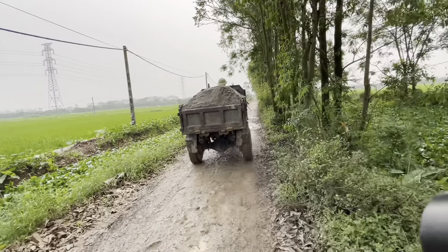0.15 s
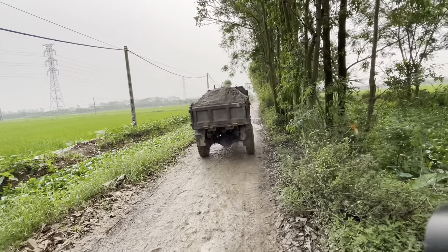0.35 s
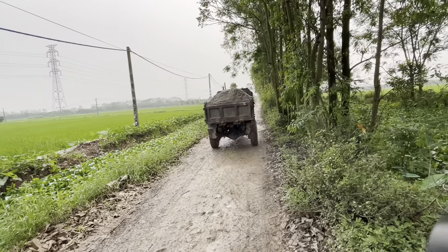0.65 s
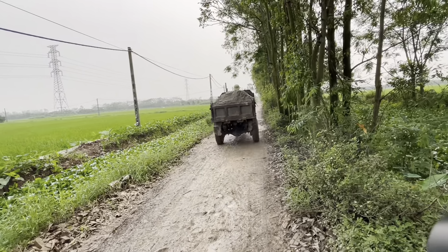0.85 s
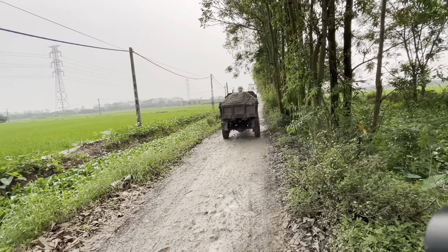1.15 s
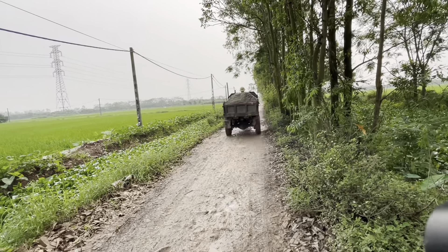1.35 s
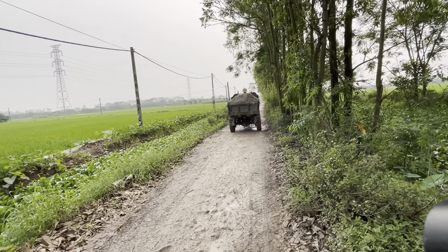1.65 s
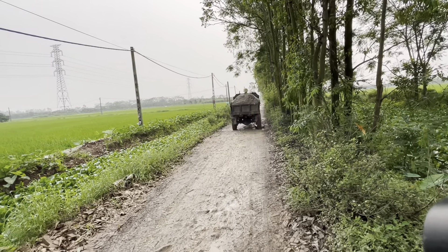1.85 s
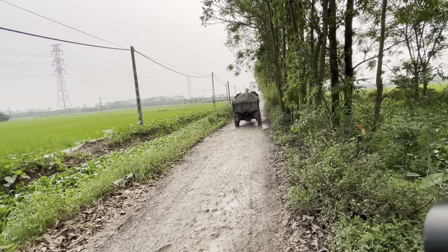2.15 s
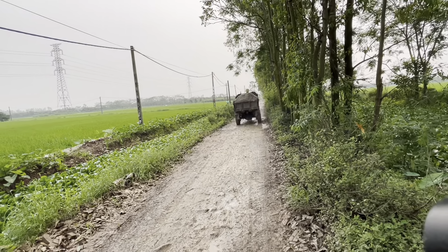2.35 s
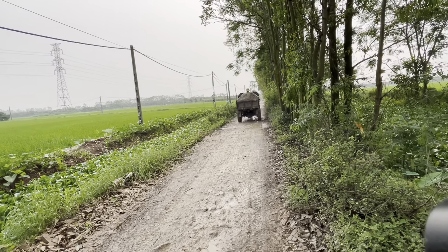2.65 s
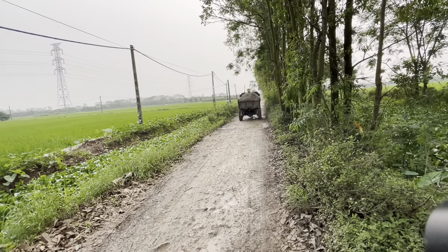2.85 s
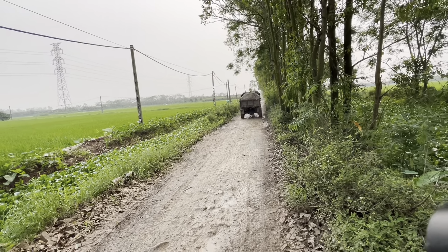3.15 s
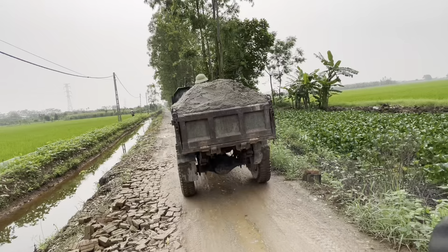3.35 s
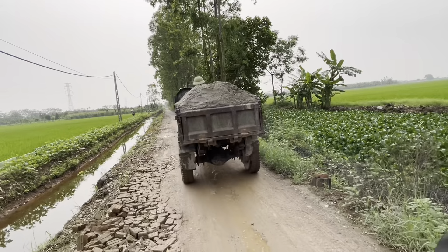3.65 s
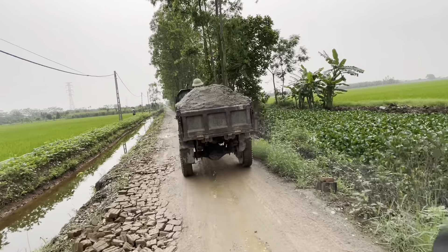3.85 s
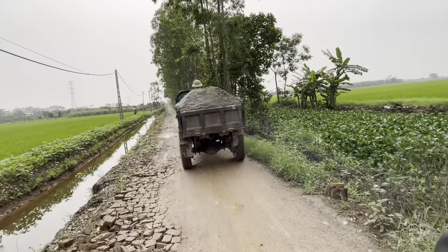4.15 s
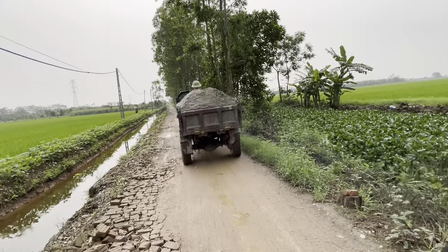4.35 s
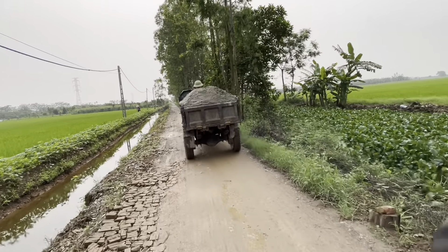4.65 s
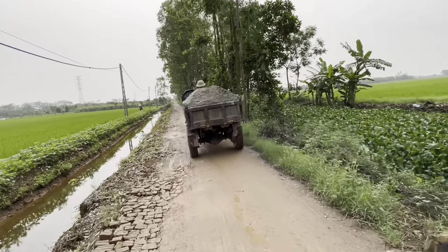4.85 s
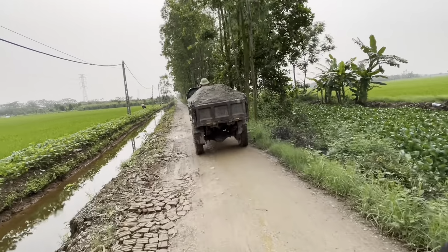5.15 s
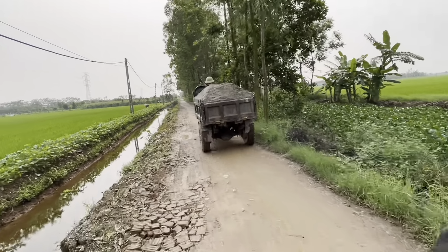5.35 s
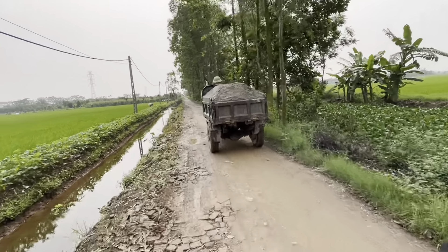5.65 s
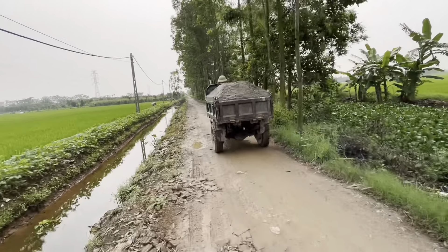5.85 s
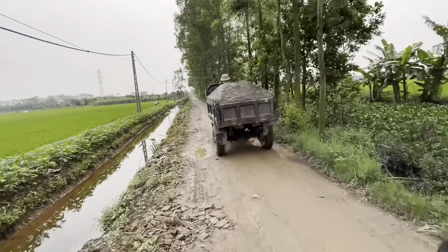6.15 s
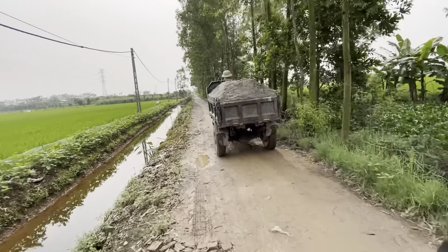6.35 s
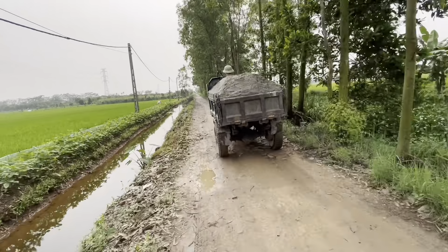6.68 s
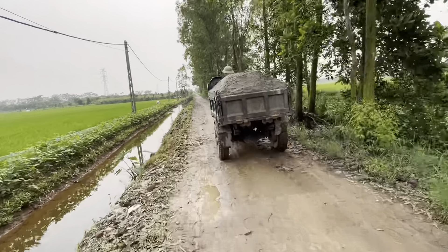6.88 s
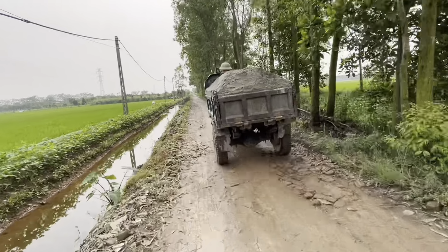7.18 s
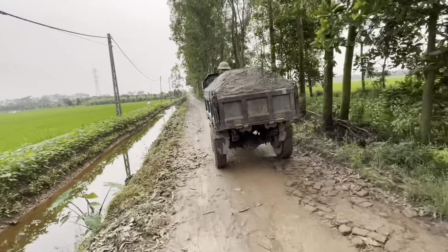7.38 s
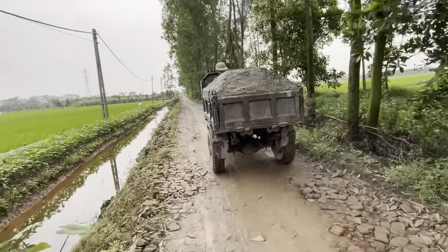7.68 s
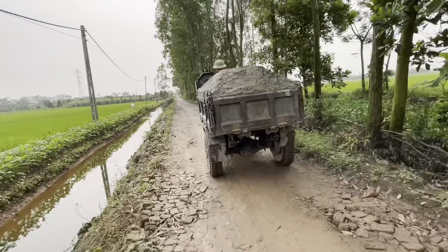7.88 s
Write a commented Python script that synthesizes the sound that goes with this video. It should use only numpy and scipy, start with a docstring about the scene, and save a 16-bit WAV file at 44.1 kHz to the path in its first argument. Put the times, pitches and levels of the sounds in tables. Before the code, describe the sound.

Steady knocking diesel chug recedes along a rural lane, drops silent for an instant, then hammers back close, with rattles and motorbike exhaust.

```python
"""A muddy, tree-lined track: a single-cylinder diesel truck chugs along, heard from a small motorbike behind it.
Each firing knocks and rings the block; about a quarter cycle later a blast excites the exhaust pipe, with hiss and clinks.
Noise and grains make the clatter, short rattling bursts, wind and a high sizzle; the bike puffs through its silencer.
The sound drops out and stutters once, then returns from close behind the truck while the bike follows."""
import sys
import numpy as np
from scipy import signal
from scipy.fft import rfft, irfft, next_fast_len
from scipy.io import wavfile

SR = 44100
rng = np.random.default_rng(int(sys.argv[2]) if len(sys.argv) > 2 else 0)


def to_wav(sig):
    """Store sig (one row per channel, or 1-D mono) as 16-bit WAV at the path in sys.argv[1].

    Samples outside -1..1 are clipped; the rate is SR.
    """
    pcm = np.clip(np.atleast_2d(sig), -1, 1) * 32767
    pcm = np.round(pcm).astype(np.int16)
    wavfile.write(sys.argv[1], SR, pcm.T)  # frames by channels


N = 353682

# Levels are relative drives; each layer adds its own gain.
# dropout, stutter and return
SILENT_S, STUTTER_S, STUTTER_END_S, RESUME_S = 3.3240, 3.3746, 3.3890, 3.3978
CUTOFF_HZ = 15795

# thin high sizzle, perhaps an insect: start_s, end_s, level_db
SIZZLE_TIMES = [(6.694, 6.923, -38), (7.56, 7.65, -40)]
SIZZLE_HZ, SIZZLE_WIDTH_HZ = 14230, 1100  # width of each of two stages

# wind on the microphone ports
WIND_STILL_DB, WIND_MOVING_DB, WIND_GROWS_DB_PER_S = -48, -35.5, 2.5

# bike exhaust level, following the throttle: time_s, level_db
BIKE_LEVEL = [(0, -18.5), (.5, -63), (3.3, -37), (3.6, -48), (3.95, -24.5), (4.06, -17), (4.3, -17),
              (4.93, -17), (5.34, -20.5), (5.58, -17), (5.96, -22), (6.25, -19.5), (6.45, -18), (6.68, -31),
              (7.39, -19.5), (7.7, -29), (8.02, -25)]
# bike engine speed, idling then under way: time_s, firings_per_s
BIKE_FIRING_RATE = [(0, 11.4), (3.3, 11.4), (3.4, 18.3), (3.6, 20.1), (3.95, 21.0), (4.08, 23.3),
                    (4.3, 28.6), (4.44, 27.5), (4.71, 27.1), (4.88, 27.65), (5.41, 25.0), (6.32, 25.05),
                    (6.5, 24.3), (6.8, 21.4), (7.21, 17.1), (8.02, 17.3)]
# bike silencer resonances: pitch_hz, width_hz, level_db
SILENCER_MODES = [(83, 13, -10.5), (94.8, 22, 2), (139, 36, -2), (263, 23, -30)]
BIKE_ROUGH = .13  # unevenness of timing and strength, 0-1
RASP_DB, RASP_FALL_S = -11.5, .013  # gas out of the silencer

# how near the truck sounds: time_s, level_db
TRUCK_NEARNESS = [(0, 2.5), (.8, -1.5), (1.7, -3.5), (2.2, -3), (3.3, -5), (3.39, 10.5), (3.46, 5.5),
                  (3.7, 0.5), (4.1, 5.5), (4.8, 3), (5.7, 4.5), (6.0, 0), (6.35, 6), (6.75, 2), (7.1, 2.5),
                  (8.02, 3)]
# clatter of gears, load bed and tyres: pitch_hz, density_db_per_hz
CLATTER_BODY_COLOUR = [(150, -30), (250, -41), (500, 12.5), (1000, -10), (1600, -6), (2500, -10)]
# treble of the clatter: pitch_hz, density_db_per_hz
CLATTER_TREBLE_COLOUR = [(1060, 13), (1800, -1), (3680, 4), (5580, -5.5), (6870, 0.5), (7450, -14),
                         (8230, 3), (10600, -5.5), (12900, -7.5), (14300, -7), (15600, -40)]
# ground rumble: pitch_hz, density_db_per_hz
RUMBLE_COLOUR = [(25, -45), (45, -37), (70, 2), (120, -3.5), (200, -18), (300, -32)]
CLATTER_DB, TREBLE_DB = -29.5, -37.5
TREBLE_FOLLOWS = 0.95  # share of nearness, in dB
CONTACTS_PER_S = 2500  # per channel
RUMBLE_ABOVE_DB = 9  # against CLATTER_DB
RUMBLE_BETWEEN_DB, RUMBLE_FALL_S = -3.5, 0.053  # floor under the swell of each blast

# short rattling bursts, source unclear: start_s, level_db, fall_s, centre_hz
RATTLING_BURSTS = [(1.998, -6, .006, 1400), (2.055, -8, .03, 1500), (4.08, -8, 0.011, 2200),
                   (4.119, -4, 0.011, 1600), (4.305, -5, .015, 1700), (4.447, -6, 0.011, 1798),
                   (5.146, -9, .01, 2000), (6.22, -5, .04, 1200), (6.39, -6, .04, 1300),
                   (6.617, -8, 0.0082, 3990), (7.18, -3, .02, 1100), (7.2094, -8, .015, 3600),
                   (7.392, 2, .012, 2100), (7.409, -7, .012, 2800), (7.485, -4, .015, 1000),
                   (7.6, -7, 0.031, 1903), (7.796, 0, .015, 2205), (7.86, -4, 0.014, 3200)]
BURST_DB, BURST_SPREAD = -20, .45  # band edges: centre divided and multiplied by 1 + spread

# diesel firings: knock_s, knock_db, low_ring_db, high_ring_hz, high_ring_db,
# blast_s, hiss_db, pop_db, clink_hz, clink_db
DIESEL_FIRINGS = [(0.075, -9, -19, 940.0, -20, 0.1058, -19, -19.5, 4400, -32.0),
                  (0.204, -15, -38, 920.0, -26, 0.2323, -17.5, -16, 4120, -21),
                  (0.34, -7.5, -19, 948, -21, 0.3731, -18.5, -14, 3860, -33.0),
                  (0.473, -11, -32, 990.0, -27, 0.5046, -21, -15.5, 3550, -31),
                  (0.602, -11, -20, 972, -27, 0.6377, -23.5, -19.5, 3750.0, -33.0),
                  (0.735, -14.5, -18.5, 970.0, -29.5, 0.7694, -22, -17.5, 3510.0, -27),
                  (0.872, -11.5, -24, 1068, -31, 0.8998, -30, -20.5, 3570.0, -36.0),
                  (1.005, -13.5, -23, 1004, -24, 1.0378, -27, -20.5, 3680.0, -32),
                  (1.138, -18, -25, 945, -29, 1.1683, -36, -29, 3400, -44.0),
                  (1.273, -14, -17, 999, -25, 1.3023, -26.5, -21.0, 3610.0, -39),
                  (1.401, -13, -19.5, 889, -31, 1.4318, -27.5, -20.5, 3930.0, -40.0),
                  (1.528, -16.5, -23, 991, -26, 1.5634, -30.5, -22.5, 3830.0, -41.0),
                  (1.666, -17.5, -25, 990.0, -27.5, 1.698, -26, -17.5, 3490.0, -38.0),
                  (1.796, -17.5, -22.5, 1000.0, -31, 1.8292, -31, -24.0, 3400.0, -37.0),
                  (1.926, -16, -35, 1073, -29, 1.9567, -34.0, -25.5, 3830.0, -39.0),
                  (2.047, -16, -35, 1097, -34, 2.0858, -42, -31.0, 3400.0, -45.0),
                  (2.181, -22, -23, 1059, -35, 2.2136, -29.5, -25.5, 3694, -35),
                  (2.318, -17, -35, 992, -30.5, 2.3519, -28.5, -24.5, 3410.0, -33),
                  (2.455, -18.5, -37, 1150.0, -30.5, 2.4853, -27.5, -26.5, 3570.0, -34),
                  (2.585, -25, -34, 1128, -37, 2.6116, -47, -34.0, 3730, -41.0),
                  (2.719, -25, -32, 990.0, -33, 2.7453, -43.0, -35.0, 3630.0, -46.0),
                  (2.853, -18, -26, 1090.0, -37, 2.8869, -27, -27.5, 3660, -34.0),
                  (2.99, -18, -32, 1020.0, -33.5, 3.0227, -32, -27.0, 3600, -43.0),
                  (3.128, -24, -24.5, 990.0, -35, 3.1573, -29.5, -27.5, 3800.0, -42.0),
                  (3.265, -22.5, -36, 890.0, -33, 3.2908, -43, -35.0, 3440, -45.0),
                  (3.456, -20, -26, 1010.0, -26, 3.4973, -11.5, -12.0, 3920.0, -19),
                  (3.636, -7, -18, 1070.0, -27, 3.6787, -14.5, -15.0, 3880.0, -27.0),
                  (3.809, -8.5, -22, 1150.0, -24, 3.8513, -15.5, -14.0, 3634, -26.0),
                  (3.985, -7.5, -21, 1000.0, -22, 4.0289, -17.5, -14.5, 3585, -35),
                  (4.16, -15, -28, 1020.0, -27, 4.1921, -11.5, -13.5, 3630.0, -22.5),
                  (4.325, -17, -23.5, 900.0, -28, 4.36, -14, -13, 3660, -24),
                  (4.486, -19, -32, 980.0, -24.5, 4.523, -14, -10.5, 3860, -21),
                  (4.658, -12, -24, 1090.0, -26, 4.7019, -18, -16, 3910.0, -21),
                  (4.83, -16, -26, 970.0, -28, 4.8639, -13.5, -17.0, 3900.0, -21.0),
                  (4.994, -14, -34, 970.0, -25, 5.0405, -19.5, -15.0, 3690, -27.0),
                  (5.159, -16.5, -32, 921, -26.5, 5.1985, -13.5, -11.5, 3580.0, -26.0),
                  (5.337, -15.5, -31, 1040.0, -30.5, 5.3715, -19.5, -17.0, 3720.0, -27.0),
                  (5.498, -12, -25, 970.0, -30, 5.5326, -15.0, -14.5, 3770.0, -26),
                  (5.66, -10, -30, 1130.0, -29, 5.6982, -18, -15.5, 4010.0, -31.0),
                  (5.82, -17.0, -33, 1283, -29.5, 5.8609, -16, -13.5, 3826, -28),
                  (5.99, -11, -37, 1010.0, -33, 6.0268, -15.0, -10.0, 3780.0, -26),
                  (6.148, -14, -29, 970.0, -29, 6.1801, -13, -14.0, 3800, -21.5),
                  (6.299, -17, -28, 867, -33, 6.3342, -15.5, -16, 4190.0, -28.0),
                  (6.455, -16, -34, 1270.0, -33, 6.5035, -15.5, -15, 4080.0, -24.0),
                  (6.646, -15, -29, 959, -32, 6.6796, -13.5, -19.0, 3740.0, -25),
                  (6.812, -8, -25, 870.0, -28, 6.853, -21, -16, 3430.0, -28.0),
                  (6.969, -7, -22.5, 900.0, -23.5, 7.01, -22, -23, 3557, -25.0),
                  (7.122, -8.5, -29, 871, -31, 7.1662, -22.5, -22.0, 3700.0, -25),
                  (7.303, -10.5, -29, 1071, -30.5, 7.3451, -28, -30, 3830.0, -37.0),
                  (7.498, -12, -28, 870.0, -28, 7.538, -16.5, -13.5, 4180.0, -28.0),
                  (7.67, -16, -37, 1091, -30.5, 7.7106, -17.5, -17.5, 3590.0, -18.5),
                  (7.849, -6.5, -24.5, 870.0, -35, 7.8816, -20, -18.0, 3630.0, -19.5),
                  (7.995, -10, -27, 940.0, -30, 8.036, -40.0, -40.0, 3790.0, -40.0)]
SCATTER_DB = 2  # firing-to-firing spread of tick, undertones (doubled) and boom (halved)

# exhaust pipe modes: pitch_hz, level_db, t60_s
PIPE_MODES = [(52, 5, 0.2), (67.2, 3.5, 0.15), (80.8, 1.5, 0.35), (98.9, -3.5, 0.6), (132.8, 6.5, 0.059),
              (186, -10, 0.033)]
# pipe mouth modes: pitch_hz, level_db, t60_s
MOUTH_MODES = [(345, 11.5, 0.018), (477.7, 17.5, 0.05), (580, 9, .03)]
# hiss of the blast: pitch_hz, density_db_per_hz
BLAST_HISS_COLOUR = [(300, -39), (1000, 3.5), (2200, -3.5), (3100, -2.5), (3800, 3), (4600, -5),
                     (7000, -11.5), (10000, -7.5), (15700, -25.5)]
HISS_RISE_S, POP_DB = .0025, -6
THUMP_DB, THUMP_FOLLOWS = -16.5, 0.22  # share following the pop; the rest follows nearness
RETURN_S, RETURN_DB = 0.01857, -3  # second push, timed from the blast
# lower pitches of the clinking part: pitch_hz, level_db against the clink
UNDERTONES = [(1420, -5.5), (2480, -12)]
CLINK_DB, CLINK_RISE_S, CLINK_FALL_S = 9, 0.00096, .005
CLINK_WANDER = .04  # share of undertone pitch
CLANK_LOW_HZ, CLANK_HIGH_HZ, CLANK_DB, CLANK_FALL_S = 900, 5200, -4.5, .007  # loose sheet metal

TICK_DB, RATTLE_DB, RATTLE_FALL_S = -16, -19.5, 0.026  # tick and valve gear, driven relative to the knock
LOW_RING_FAR_HZ, LOW_RING_NEAR_HZ = 644.7, 782.5
RING_DB, RING_RISE_S, RING_FALL_S = 14.5, .003, .011
RING_WANDER = 0.00801  # share of pitch
RING_ROUGH_FAR, RING_ROUGH_NEAR = .45, 1.2  # phase shake, radians

# block and bodywork, truck drawing away: pitch_hz, width_hz, level_db
BODY_FAR_MODES = [(227, 36, 5), (449, 80, 6.5), (545, 74, 11), (643.5, 60, 12), (938, 120, 4.5),
                  (1110, 126, -1.5), (1399, 60, -4), (1700, 200, -9), (2210, 340, -11), (2792, 32, -9),
                  (3640, 69, -6.5)]
# block and bodywork, truck close ahead: pitch_hz, width_hz, level_db
BODY_NEAR_MODES = [(243, 65, 2.5), (340, 127, 6), (465, 167, 4), (598, 90, 6.5), (779, 90, 1),
                   (997, 71, -2.5), (1213, 70, -5.5), (1476, 70, -4.5), (1710, 220, -11), (2050, 115, -11),
                   (3007, 90, -12), (3680, 120, -16), (4760, 77, -24)]
# ground and tree-row reflections, before the stretch on each side: delay_s, level_db
REFLECTIONS = [(.006, -16), (.013, -14.5), (0.024, -16.5), (.041, -17)]
TAIL_DB, TAIL_T60_S = -12.5, .18  # scatter from the trees
# wet track reflection, before dulling: time_s, nominal_first_notch_hz, strength_0_to_1
WET_TRACK = [(0, 820, 0.43), (3.3, 846, 0.37), (3.4, 661.4, 0.23), (5.6, 715, 0.06), (6.2, 683, 0.34),
             (8.02, 626, 0.57)]

# left-right likeness of noise: pitch_hz, likeness_0_to_1
CHANNEL_LIKENESS = [(60, .8), (250, .6), (450, .55), (1000, .7), (2000, .5), (3600, .65), (5000, .3),
                    (9000, .4), (11000, .5), (12800, .86)]
# left port against right: pitch_hz, level_db
PORT_TILT = [(40, -3), (70, -6.5), (130, -4), (250, -6), (460, -15), (760, -4), (1300, -4), (3000, -2),
             (4000, -3), (5000, 2), (6000, 4), (7500, -3.5), (9000, -2), (11500, -1)]
# left port ahead of right: pitch_hz, phase_rad
PORT_LEAD = [(130, -.4), (350, -.7), (450, -1.5), (560, -3.9), (1000, -5.3), (1700, -6.1), (3500, -5.1),
             (5300, -3.1), (7200, -.7), (8300, 3), (10500, 2.8), (12400, 0)]


def amp(db):
    """Decibels to amplitude."""
    return 10 ** (np.asarray(db) / 20)


def rms_one(x):
    """Scale to overall rms 1."""
    return x / np.sqrt(np.mean(x ** 2) + 1e-20)


def in_time(rows):
    """Interpolate each column of a time table at every sample."""
    time_s, *columns = np.transpose(rows)
    return [np.interp(np.arange(N) / SR, time_s, column) for column in columns]


def at_hz(points, hz):
    """Interpolate a spectrum over log frequency."""
    point_hz, values = np.array(points).T
    return np.interp(np.log(hz), np.log(point_hz), values)


def close_behind():
    """True from the dropout onwards."""
    return np.arange(N) >= SILENT_S * SR


def held(s, values):
    """Each event's value lasts until the next event."""
    return values[np.maximum(np.searchsorted(s * SR, np.arange(N)) - 1, 0)]


def drift(rate_hz):
    """Slow chance of rms 1: coarse noise through a double one-pole low-pass."""
    r = np.exp(-80 * np.pi * rate_hz / SR)  # one coarse step is 40 samples
    noise = rng.standard_normal(N // 40 + 2002)
    slow = signal.lfilter([1], [1, -2 * r, r * r], noise)[2000:]
    return np.interp(np.arange(N) / 40, np.arange(len(slow)), rms_one(slow))


def clicks(s, db):
    """One impulse per event."""
    out = np.full(N, 1e-18)
    out[np.minimum((np.asarray(s) * SR).astype(int), N - 1)] = amp(db)
    return out


def swell(train, rise_s, fall_s):
    """Each impulse becomes an exponential rise and fall."""
    up, down = np.exp(-1 / (rise_s * SR)), np.exp(-1 / (fall_s * SR))
    decays = signal.lfilter([1], [1, -down], train)
    return signal.lfilter([1 - up], [1, -up], decays)


def ring(x, modes, crest):
    """Struck modes; crest starts at full pressure as behind a sudden puff, otherwise from rest."""
    out = 0
    for hz, level_db, t60_s in modes:
        r, w = amp(-60 / (t60_s * SR)), 2 * np.pi * hz / SR
        start = [1, -r * np.cos(w)] if crest else [0, np.sin(w)]
        out = out + amp(level_db) * signal.lfilter(start, [1, -2 * r * np.cos(w), r * r], x)
    return out


def resonate(x, peaks, uneven_db=0):
    """Parallel resonances of alternating sign, optionally with drifting drive."""
    out = 0
    for k, (hz, width_hz, level_db) in enumerate(peaks):
        r = np.exp(-np.pi * width_hz / SR)
        poles = [1, -2 * r * np.cos(2 * np.pi * hz / SR), r * r]
        drive = amp(level_db + uneven_db * drift(19.0)) if uneven_db else amp(level_db)
        out = out + (-1) ** k * (1 - r * r) / 2 * signal.lfilter([1, 0, -1], poles, drive * x)
    return out


def tone(hz, wander, rough=0):
    """A sine of wandering pitch; roughness shakes its phase and smears it."""
    phase = 2 * np.pi * np.cumsum(hz * (1 + wander * drift(4))) / SR
    return np.sin(phase + rough * drift(106))


def stereo_noise(spectrum, grains_per_s=None):
    """Coloured two-channel noise, smooth or of uneven clicks, with set left-right likeness; rms 1."""
    size = next_fast_len(N)
    hz = np.maximum(np.arange(size // 2 + 1) * SR / size, 1)
    white = rng.standard_normal((2, size))
    if grains_per_s:
        struck = rng.random((2, size)) < grains_per_s / SR
        white = white * struck * amp(3.0 * np.minimum(rng.exponential(1, (2, size)), 5))
    mid, side = rfft(white)
    alike = np.clip(at_hz(CHANNEL_LIKENESS, hz), 0, 1)
    both = np.sqrt(1 + alike) * mid + np.sqrt(1 - alike) * side * [[1], [-1]]
    inside = (hz > spectrum[0][0]) & (hz < spectrum[-1][0])
    return rms_one(irfft(both * amp(at_hz(spectrum, hz)) * inside, size)[:, :N])


def echoes(x):
    """Dull reflections arrive at different moments on each side."""
    out, dull = np.tile(x, (2, 1)), signal.lfilter([.5], [1, -.5], x)
    for delay_s, level_db in REFLECTIONS:
        for side, stretch in enumerate((.85, 1.2)):
            lag = int(delay_s * stretch * SR)
            out[side, lag:] += amp(level_db) * dull[:-lag]
    return out


def sizzle():
    """Narrow, fluttering noise near the top of hearing, alike on both sides."""
    t = np.arange(N) / SR
    gate = sum(amp(db) * np.clip(np.minimum(t - start, end - t) / 0.022, 0, 1)
               for start, end, db in SIZZLE_TIMES)
    band = [(SIZZLE_HZ, SIZZLE_WIDTH_HZ, 0)]
    narrow = resonate(resonate(rng.standard_normal(N), band), band)
    return rms_one(narrow) * gate * amp(2.3 * drift(50))


def wind():
    """Lumpy low noise, independent in each port; faint at a standstill, growing once the bike moves."""
    moving_s = np.arange(N) / SR - SILENT_S
    level_db = np.where(moving_s < 0, WIND_STILL_DB, WIND_MOVING_DB + WIND_GROWS_DB_PER_S * moving_s)
    band = signal.butter(2, [28, 380], "band", fs=SR, output="sos")
    low = signal.sosfilt(band, rng.standard_normal((2, N)))
    return rms_one(low) * amp(level_db + 2.2 * np.array([drift(4.8), drift(1.7)]))


def bike():
    """One uneven puff per firing excites the silencer, with a rasp of gas."""
    (per_s,), (level_db,) = in_time(BIKE_FIRING_RATE), in_time(BIKE_LEVEL)
    turns = np.cumsum(per_s) / SR + .2 * BIKE_ROUGH * drift(9)
    fired = np.diff(np.floor(np.maximum.accumulate(turns)), prepend=0) > 0
    strength = amp(8 * BIKE_ROUGH * rng.standard_normal(N))
    puffs = swell(fired * strength + 1e-18, 0.00035, 0.0011)
    exhaust_note = rms_one(resonate(puffs, SILENCER_MODES)) * amp(level_db + 5.5)
    gas = stereo_noise([(300, -2), (600, -3), (1300, 1), (2000, -8), (3500, -20)])
    rasp = gas * swell(fired * strength ** 3 + 1e-18, .003, RASP_FALL_S)
    return echoes(exhaust_note) + rasp * amp(level_db + RASP_DB)


def rumble(body_db):
    """Low ground noise swells with each blast and sinks before the next."""
    blast_s = np.transpose(DIESEL_FIRINGS)[5]
    low = stereo_noise(RUMBLE_COLOUR) * amp(body_db + RUMBLE_ABOVE_DB + 2 * drift(5))
    return low * (amp(RUMBLE_BETWEEN_DB) + swell(clicks(blast_s, 0), 0.0073, RUMBLE_FALL_S))


def clatter():
    """Small contacts: their force on the body, and tyre and gear noise in the air."""
    near_db, = in_time(TRUCK_NEARNESS)
    body_db, treble_db = CLATTER_DB + near_db, TREBLE_DB + TREBLE_FOLLOWS * near_db
    lumps = amp(2.0 * drift(25))
    contacts = stereo_noise([(150, 6.2), (6000, 1.7)], grains_per_s=CONTACTS_PER_S)
    force = contacts * amp(body_db + 8.0) * lumps
    body = stereo_noise(CLATTER_BODY_COLOUR) * amp(body_db - 9.0 + 4.3 * drift(5.3))
    treble = stereo_noise(CLATTER_TREBLE_COLOUR, grains_per_s=16000) * amp(treble_db + 0.5) * lumps
    return force, body + treble + rumble(body_db)


def rattling_bursts():
    """Each burst is a short rattle of grains, band-passed around its own pitch."""
    out, grains = np.zeros((2, N + SR)), stereo_noise([(200, 0), (9000, -3)], grains_per_s=6000)
    t = np.arange(SR // 5) / SR
    for s, level_db, fall_s, hz in RATTLING_BURSTS:
        start = int(s * SR)
        shape = (1 - np.exp(-t / 0.0027)) * np.exp(-t / fall_s)
        band = signal.butter(1, [hz / (1 + BURST_SPREAD), hz * (1 + BURST_SPREAD)], "band", fs=SR)
        part = grains[:, start:start + len(t)]
        length = part.shape[1]
        burst = rms_one(signal.lfilter(*band, part)) * shape[:length]
        out[:, start:start + length] += amp(BURST_DB + level_db) * burst
    return out[:, :N]


def clank(count=6):
    """Each blast strikes loose sheet metal, which rings on pitches that differ from blast to blast."""
    s, hiss_db = np.transpose(DIESEL_FIRINGS)[5:7]
    place, late, chance = rng.random((3, len(s), count))
    range_share = (np.arange(count) + place) / count
    pitches_hz = CLANK_LOW_HZ * (CLANK_HIGH_HZ / CLANK_LOW_HZ) ** range_share
    out = 0
    for hz, lag, less in zip(pitches_hz.T, late.T, chance.T):
        strikes = clicks(s + .009 * lag, hiss_db + CLANK_DB - 12 * less)
        sine = np.sin(2 * np.pi * np.cumsum(held(s, hz)) / SR)
        out = out + sine * swell(strikes, 0.0013, CLANK_FALL_S)
    return out


def clink():
    """A metal part clinks at each blast on its own pitch, with uneven undertones."""
    s, _, _, hz, level_db = np.transpose(DIESEL_FIRINGS)[5:]
    level_db = level_db + CLINK_DB
    out = tone(held(s, hz), 0) * swell(clicks(s, level_db), CLINK_RISE_S, CLINK_FALL_S)
    uneven_db = 2 * SCATTER_DB * rng.standard_normal((len(s), len(UNDERTONES)))
    for (under_hz, under_db), chance_db in zip(UNDERTONES, uneven_db.T):
        strikes = clicks(s, level_db + under_db + chance_db)
        out = out + tone(under_hz, CLINK_WANDER) * swell(strikes, CLINK_RISE_S, CLINK_FALL_S)
    return out


def exhaust():
    """Blast: force shaking the panels; pop at the mouth, pipe boom, metal and gas hiss in the air."""
    s, hiss_db, pop_db = np.transpose(DIESEL_FIRINGS)[5:8]
    scatter_db = SCATTER_DB * rng.standard_normal(len(s))
    near_db = np.interp(s, *np.transpose(TRUCK_NEARNESS))
    thump_db = THUMP_DB + THUMP_FOLLOWS * pop_db + (1 - THUMP_FOLLOWS) * near_db + scatter_db / 2
    pop = ring(swell(clicks(s + 0.002, pop_db + POP_DB - 16.0), 0.00063, 0.0011), MOUTH_MODES, crest=True)
    # the puff runs down the pipe and comes back once
    push = clicks(s + 0.0028, thump_db - 24.5) + clicks(s + RETURN_S, thump_db - 27.5 + RETURN_DB)
    thump = -ring(swell(push, 0.00015, 0.00052), PIPE_MODES, crest=False)
    jet = clicks(s - .0025, hiss_db - 2.5)
    puff = swell(jet, HISS_RISE_S, 0.0079) + amp(-1.5) * swell(jet, HISS_RISE_S, 0.016)
    hiss = stereo_noise(BLAST_HISS_COLOUR) * puff
    shake = stereo_noise([(200, 18.0), (6000, 3.6)], grains_per_s=2500) * swell(jet, 0.0008, 0.0069)
    return amp(9) * shake, echoes(pop + thump + clink() + clank()) + hiss


def block_rings():
    """Each knock rings the block roughly on two pitches that swell and die within hundredths of a second."""
    s, _, low_db, high_hz, high_db = np.transpose(DIESEL_FIRINGS)[:5]
    near = close_behind()
    low_hz = np.where(near, LOW_RING_NEAR_HZ, LOW_RING_FAR_HZ)
    rough = np.where(near, RING_ROUGH_NEAR, RING_ROUGH_FAR)
    out = 0
    for hz, level_db in ((low_hz, low_db), (held(s, high_hz), high_db)):
        envelope = swell(clicks(s - .002, level_db + RING_DB), RING_RISE_S, RING_FALL_S)
        out = out + tone(hz, RING_WANDER, rough) * envelope
    return echoes(out)


def knocks():
    """Firing: a cluster of clacks forces the block; rings, tick and valve-gear rattle ride on top."""
    s, knock_db = np.transpose(DIESEL_FIRINGS)[:2]
    tick_db = knock_db + TICK_DB + SCATTER_DB * rng.standard_normal(len(s))
    clacks = stereo_noise([(200, -5), (650, -5.5), (1000, -4.5), (1500, 1.0), (6000, -0.5)], grains_per_s=11000)
    force = clacks * swell(clicks(s - .001, knock_db + 5.5), .0025, 0.02)
    force = force + swell(clicks(s - .001, knock_db + 11), .0001, 0.000096)  # first, hardest clack
    tick = stereo_noise([(1500, 6), (2600, 0.5), (4200, 9.5), (5500, -1.0), (9000, 2.0), (15700, -14)])
    tick = tick * swell(clicks(s - .002, tick_db), 0.023, 0.025)
    rattle = stereo_noise([(1400, 1), (2200, 0), (4000, 0), (4700, -26)], grains_per_s=17000)
    rattle = rattle * swell(clicks(s, knock_db + RATTLE_DB), 0.0024, RATTLE_FALL_S)
    return force, block_rings() + rattle + tick


def bodywork(force):
    """Forces ring the truck's resonances, a second set from close behind; drifting drive varies the blows."""
    near = resonate(force, BODY_NEAR_MODES, uneven_db=3)
    far = resonate(force, BODY_FAR_MODES, uneven_db=2.5)
    return np.where(close_behind(), near, far)


def trees(x):
    """Trunks and leaves scatter back a short dull tail, its own on each side."""
    t = np.arange(SR // 2) / SR
    tail = rng.standard_normal((2, len(t))) * amp(-60 * t / TAIL_T60_S) * (1 - np.exp(-t / 0.0096))
    tail = signal.sosfilt(signal.butter(1, [350, 2500], "band", fs=SR, output="sos"), tail)
    tail = tail / np.sqrt(np.sum(tail ** 2, 1, keepdims=True))
    return x + amp(TAIL_DB) * signal.fftconvolve(x, tail, axes=1)[:, :N]


def ground(x):
    """Wet track: a dull copy is delayed by half a period of the nominal notch pitch."""
    notch_hz, strength = in_time(WET_TRACK)
    dull = signal.lfilter([.25], [1, -.75], x)
    earlier = np.arange(N) - SR / (2 * notch_hz)
    delayed = np.array([np.interp(earlier, np.arange(N), side) for side in dull])
    return x + np.clip(strength, 0, 1) * delayed


def scene():
    """Truck and rattling bursts reflected by trees and track, plus bike, wind and sizzle."""
    forces, airborne = np.sum([clatter(), exhaust(), knocks()], axis=0)
    truck = bodywork(forces) + airborne
    return sizzle() + wind() + bike() + ground(trees(truck + rattling_bursts()))


def record(dry):
    """Ports colour the sides differently; the sound drops out and stutters; peaks round off, the top is cut."""
    size = next_fast_len(N + 4096)
    hz = np.maximum(np.arange(size // 2 + 1) * SR / size, 1)
    left_port = amp(at_hz(PORT_TILT, hz)) * np.exp(1j * at_hz(PORT_LEAD, hz))
    x = np.array([irfft(rfft(dry[0], size) * left_port, size)[:N], dry[1]])
    # small capsules lose the deepest bass
    x = signal.sosfilt(signal.butter(3, 31, "high", fs=SR, output="sos"), x)
    silent, stutter, end, resume = (round(s * SR) for s in (SILENT_S, STUTTER_S, STUTTER_END_S, RESUME_S))
    x[:, resume:resume + 150] *= np.linspace(0, 1, 150)
    x[:, silent:resume] = 0
    x[:, stutter:end] = x[:, resume:resume + end - stutter]  # the first instants play twice
    rounded = 1.043 * np.tanh(x / 2.126)
    return signal.sosfilt(signal.cheby2(24, 45, CUTOFF_HZ, fs=SR, output="sos"), rounded)


dry = scene()
out = record(dry)
to_wav(out)
```